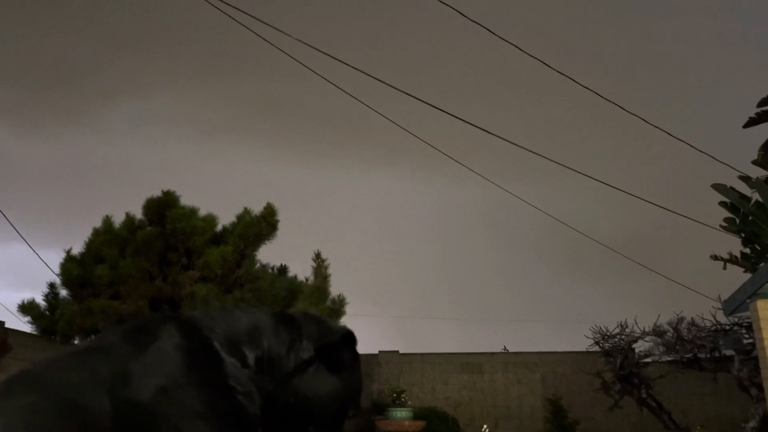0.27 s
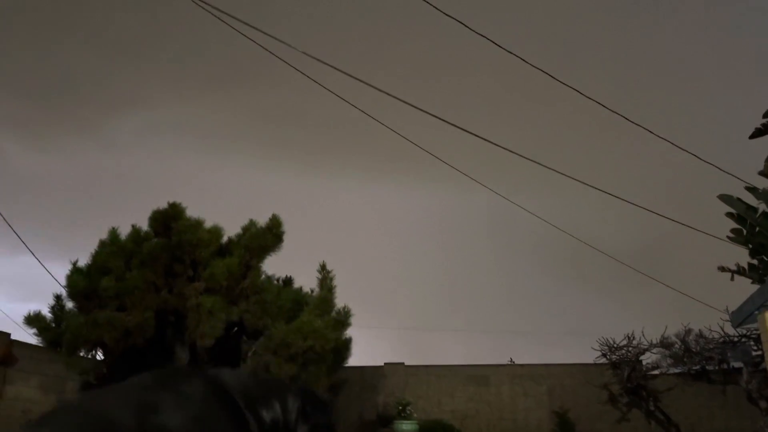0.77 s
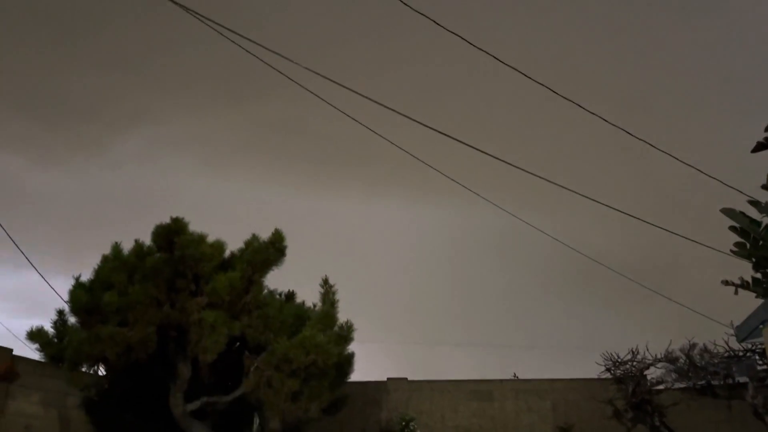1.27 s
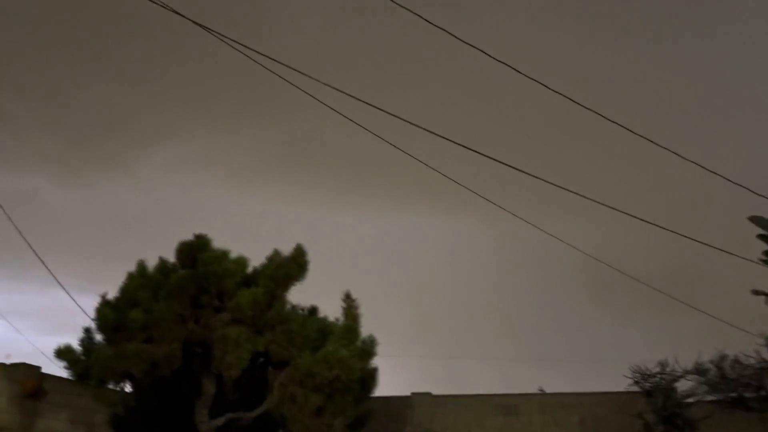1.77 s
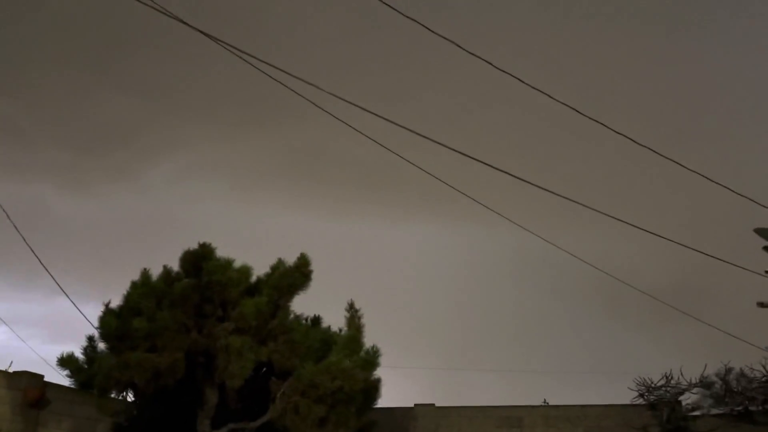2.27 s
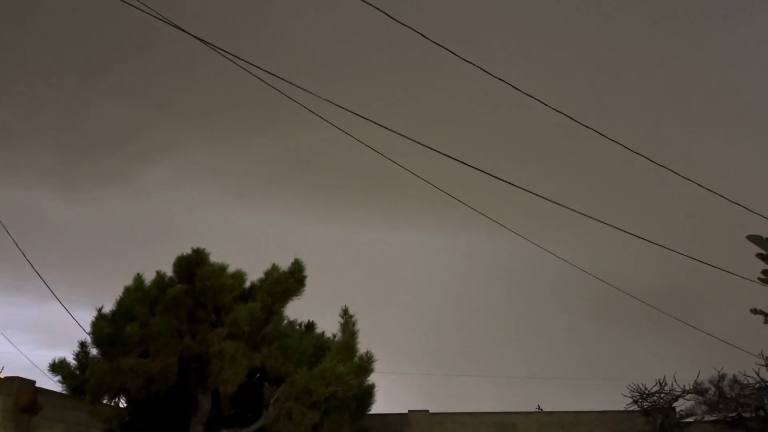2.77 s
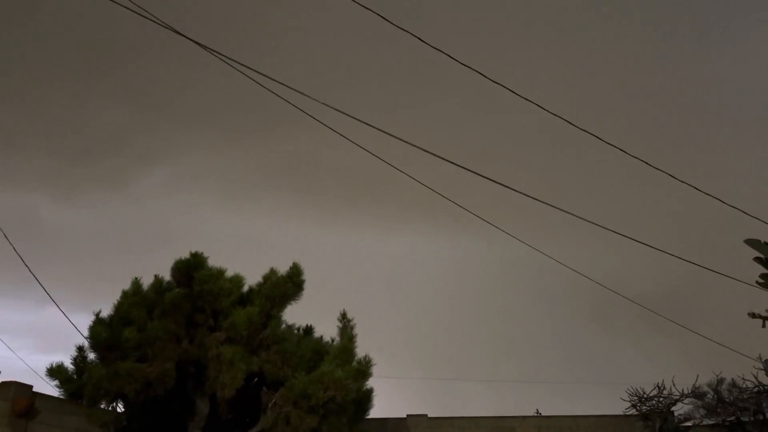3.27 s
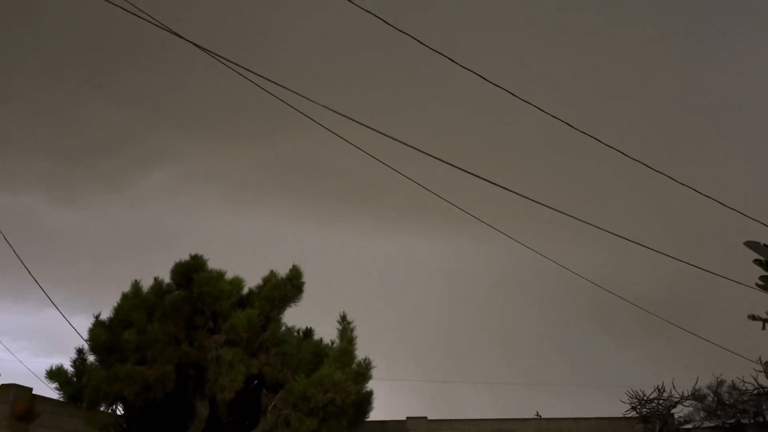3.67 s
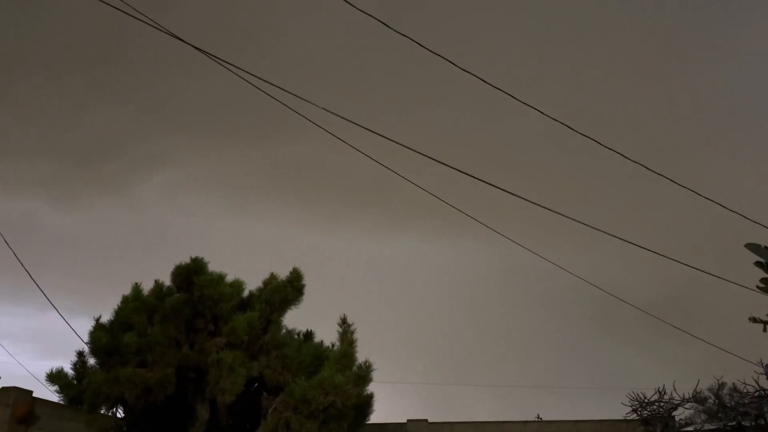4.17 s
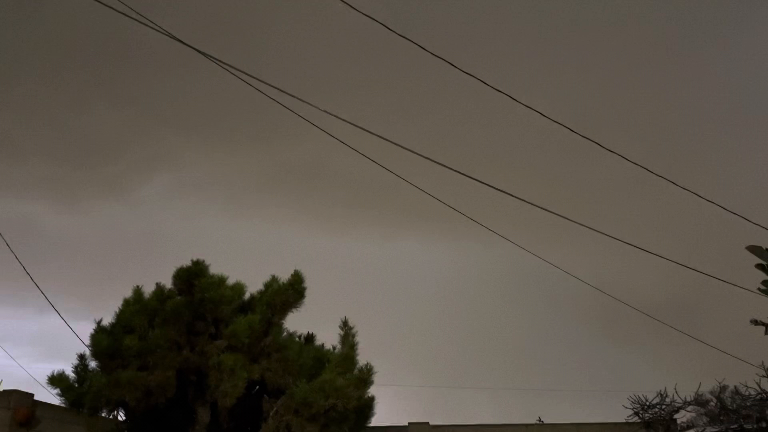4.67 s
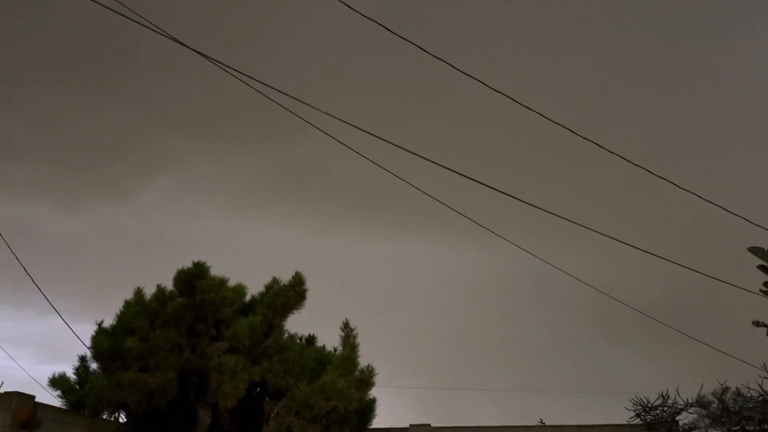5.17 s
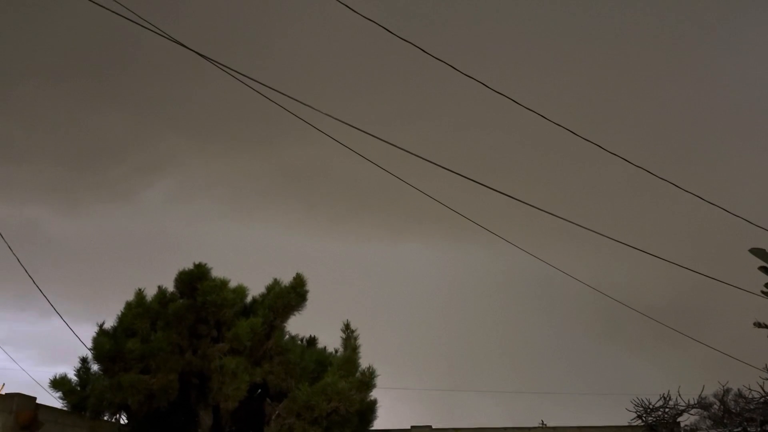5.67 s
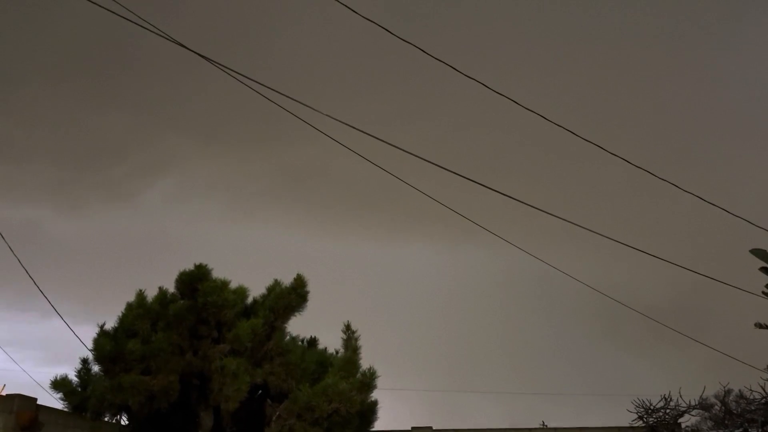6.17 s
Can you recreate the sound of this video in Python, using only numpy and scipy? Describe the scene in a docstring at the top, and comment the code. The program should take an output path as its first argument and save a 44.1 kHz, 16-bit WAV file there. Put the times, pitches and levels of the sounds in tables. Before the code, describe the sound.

Deep thunder rolls and booms in uneven waves over a walled yard while a dog close by moves off, collar tags clinking, claws tapping.

```python
"""A walled yard at night, heard in stereo. From the start far thunder rolls on as filtered noise and
random shocks from a long lightning channel; its nearest shocks are single booms.
Close by a dog moves off at once: gritty noise for its rustling coat, ringing modes for its collar tags.
The clinks thin out, then claws tap the paving three times as noise bursts with rings. Late on the booms
cease and the roll runs on over a bed of air and microphone hiss."""
import sys
import numpy as np
from scipy import signal
from scipy.fft import rfft, irfft, next_fast_len
from scipy.io import wavfile
from scipy.ndimage import uniform_filter1d

SR = 44100
rng = np.random.default_rng(int(sys.argv[2]) if len(sys.argv) > 2 else 0)


def unload_audio(sound):
    """Save the sound as a 16-bit wav file, at the path given as the first command line argument."""
    columns = np.transpose(np.atleast_2d(sound))
    # keep every value between -1 and 1, then stretch to whole-number steps
    steps = np.round(np.clip(columns, -1, 1) * 32767)
    wavfile.write(sys.argv[1], SR, steps.astype(np.int16))


N = 282681
SIZE = next_fast_len(N + SR // 4)  # padded, so that filter tails do not wrap onto the start
HZ = np.fft.rfftfreq(SIZE, 1 / SR)
# Levels in all tables hold at the source, before the stereo image and the recorder.


def amp(db):
    """Amplitude factor of a level in dB."""
    return 10 ** (np.asarray(db) / 20)


def evened(x):
    """Scales a signal to rms 1."""
    return x / np.sqrt(np.mean(x ** 2) + 1e-20)


def read(points, hz):
    """Reads a table of (f/Hz, value) on a log-frequency axis."""
    f, value = np.transpose(points)
    return np.interp(np.log(hz + 1), np.log(f + 1), value)


def curves(rows):
    """Draws each column of a (t/s, ...) table as a curve over the whole scene."""
    s, *columns = np.transpose(rows)
    return [np.interp(np.arange(N) / SR, s, column) for column in columns]


def filtered(x, gain):
    """Filters a signal by a gain over HZ."""
    return irfft(rfft(x, SIZE) * gain, SIZE)[..., :N]


def coloured(x, gain):
    """Filters two draws by a gain over HZ, to rms 1."""
    return evened(filtered(x, gain))


def shocks(per_s, spread_db):
    """Two trains of random impulses, a few of them large."""
    rarity = np.minimum(rng.exponential(1, (2, N)), 4)
    size = amp(spread_db * rarity) * rng.standard_normal((2, N))
    return size * (rng.random((2, N)) < per_s / SR)


# Night air and microphone hiss, and a faint narrow whistle-like band at 12 kHz (f/Hz, level/dB per Hz)
HISS_COLOUR = [(1000, -13), (1800, 4), (2500, -1.5), (4200, -8), (7000, -11.5), (10000, -22.5),
               (11600, -26), (12000, -6), (12400, -20), (13000, -31), (15800, -27.5)]
HISS_DB, HISS_PATCHY_DB = -70, 4
# Below FRINGE_HZ the hiss is the thunder's fringe and follows its top, by FRINGE_FOLLOW dB per dB
FRINGE_FOLLOW, FRINGE_HZ, FRINGE_MID_DB = .4, 2600, -38.5


def hiss():
    """Patchy hiss above, and a lower part that rises and fades with the thunder."""
    spectrogram = signal.stft(rng.standard_normal((2, N)), nperseg=512)[2]
    patches = rng.standard_normal(spectrogram.shape[1:])
    patches = uniform_filter1d(patches, size=6, axis=0)  # over frequency
    patches = evened(uniform_filter1d(patches, size=10, axis=1))  # over time
    patchy = signal.istft(spectrogram * amp(HISS_PATCHY_DB * patches), nperseg=512)[1][:, :N]
    bed = coloured(patchy, amp(read(HISS_COLOUR, HZ)))
    low = 1 / (1 + (HZ / FRINGE_HZ) ** 4)
    fringe, rest = filtered(bed, low), filtered(bed, 1 - low)
    thunder_top_db = curves(ROLL)[-1]
    return amp(HISS_DB) * (rest + fringe * amp(FRINGE_FOLLOW * (thunder_top_db - FRINGE_MID_DB)))


# Claws on the paving, close by (t/s, snap level before colouring/dB, knock peak/dB)
TAPS = [(3.297, -40, -53.5), (3.41, -56.5, -66.5), (4.569, -41.5, -27.5)]
# Colour of a snap on the paving (f/Hz, level/dB)
PAVING = [(900, -10), (1500, 0), (2200, 0), (3000, -5), (3700, 1), (5500, -1), (9000, -18), (16000, -24)]
# Body that a tap leaves ringing (f/Hz, level/dB, t60/s)
TAP_RINGS = [(1300, -14.5, .03), (1990, -19, 0.02), (3580, -14, 0.012), (4470, -14.5, 0.015),
             (5700, -28.5, 0.07)]


def taps():
    """A dry snap with a rough ringing tail, and a hollow knock below it."""
    snaps, knocks, t = np.zeros((2, N + SR)), np.zeros((2, N + SR)), np.arange(4000) / SR
    for s, snap_db, knock_db in TAPS:
        fade = amp(-60 * t / 0.012) + amp(-13 - 60 * t / .07)  # a short and a long decay
        burst = rng.standard_normal((2, len(t))) * fade
        rough = 1 + evened(uniform_filter1d(rng.standard_normal((2, len(t))), size=90))
        rings = sum(amp(db - 60 * t / t60) * np.sin(2 * np.pi * hz * t) for hz, db, t60 in TAP_RINGS)
        knock = amp(knock_db - 60 * t / 0.044) * np.sin(2 * np.pi * 800 * t)
        start = round(s * SR)
        snaps[:, start:][:, :len(t)] += amp(snap_db) * (burst + rough * rings)
        knocks[:, start:][:, :len(t)] += knock
    return filtered(snaps[:, :N], amp(read(PAVING, HZ))) + knocks[:, :N]


# The dog's moves, close by (t of full strength/s, hold/s, rustle level/dB, brightness/dB, f of colour/Hz)
MOVES = [(0.044, 0.018, -64, 8, 5670), (0.119, 0.0037, -65.5, 6, 5610), (0.209, .02, -71, 9, 5620),
         (0.378, 0.013, -56.5, -4, 4790), (0.603, 0.0038, -66, 0, 5810), (0.634, 0.0065, -57, 0, 5650),
         (0.703, 0.013, -71, 7, 5920), (0.856, .13, -65, -6.5, 4740), (1.06, 0.048, -69.5, 2, 5390),
         (1.215, 0.015, -58, 0.5, 5660), (1.277, 0.015, -70, 1, 4890), (1.351, 0.047, -75, 9.5, 3420),
         (1.481, 0.13, -61.5, -7, 5390), (1.666, 0.015, -64, -9, 5450), (1.728, 0.042, -72, 2, 5710),
         (1.897, 0.024, -69, -3, 4130), (1.967, 0.1, -66, -6, 4620), (2.115, 0.029, -69.5, -13.5, 3970),
         (2.254, 0.042, -68, -1.5, 5640), (2.411, 0.018, -64.5, -6.5, 4610),
         (2.475, 0.046, -67, -3.5, 4770), (2.735, 0.011, -78, -6, 4050), (2.798, 0.051, -69.5, 4.5, 5630),
         (2.894, 0.076, -80.5, -14.5, 2996), (3.034, 0.037, -79, 13, 3020), (3.302, 0.012, -64.5, 0, 4260),
         (3.419, 0.032, -84, -5.5, 3500), (3.597, 0.067, -82, -5, 3180), (3.736, 0.016, -83.5, -3, 3050),
         (3.872, 0.047, -85.5, -3.5, 4500), (4.07, 0.045, -71, -11, 3850), (4.373, 0.017, -79.5, -5, 3740),
         (4.567, 0.048, -72.5, 1.5, 4016), (4.669, .05, -70.5, 3, 4820), (4.901, 0.046, -70.5, -13, 2950),
         (5.006, 0.077, -77, -15, 2980), (5.154, 0.017, -66.5, -7, 2850), (5.214, 0.035, -77, 12, 3690),
         (5.343, 0.019, -63.5, 0.5, 4230), (5.457, 0.044, -74, -10, 3010), (5.828, 0.031, -71, -13, 3110),
         (6.151, 0.055, -71, 1.5, 4820), (6.298, 0.044, -68.5, -28, 3860)]
RISE_DB_PER_S, FALL_DB_PER_S = 807, 450
# Faint, uneven stirring between the moves
STIR_DB, STIR_BRIGHT_DB, STIR_HZ = -84, -9.5, 3070
STIR_WANDER_DB, STIR_FADE_DB_PER_S = 5, 2


def moves():
    """Each move rises fast, holds and dies away; the loudest one dominates brightness and colour."""
    s, hold, db, bright_db, hz = np.transpose(MOVES)[:, :, None]
    t = np.arange(0, N + 64, 64) / SR
    before, after = np.maximum(s - t, 0), np.maximum(t - s - hold, 0)
    level = amp(db - RISE_DB_PER_S * before - FALL_DB_PER_S * after)
    wander = evened(uniform_filter1d(rng.standard_normal(len(t)), size=60))
    stir = amp(STIR_DB - STIR_FADE_DB_PER_S * t + STIR_WANDER_DB * wander)
    dull = level.sum(0) + stir
    bright = (level * amp(bright_db)).sum(0) + stir * amp(STIR_BRIGHT_DB)
    colour_hz = ((level * hz).sum(0) + stir * STIR_HZ) / dull
    return [np.interp(np.arange(N) / SR, t, curve) for curve in (dull, bright, colour_hz)]


# Dull and bright half of the rustle (f/Hz, level/dB per Hz)
DULL = [(1200, -28), (2000, 7), (3300, -2.5), (4600, -2), (6000, -2), (7500, 7), (9500, -32.5),
        (16000, -26.5)]
BRIGHT = [(5000, -23.5), (8000, -6), (10000, 2), (12000, -9), (13000, -1), (15000, -7), (16000, 7)]
# Modes of the metal collar tags (f/Hz, level/dB, t60/s)
TAGS = [(3880, -11, .07), (4325, -11, .06), (4580, -8, .05), (5655, -2, .06), (5745, -3, .055),
        (6020, -10, .04), (6300, -10, .03), (7140, -14, .04), (10480, -16, .04), (10880, -14, .05),
        (11350, -13, .03), (11810, -17, .045)]
GRIT_PER_S, GRIT_SPREAD_DB, GRIT_SHARE = 900, 2.6, 1.1
JINGLE_SHARE, JINGLE_FADE_DB_PER_S = 0.81, 5


def rustle():
    """Fur and collar rub: gritty hiss with a drifting colour, and uneven ticks that set the tags ringing."""
    level, bright, hz = moves()
    grit = evened(shocks(GRIT_PER_S, GRIT_SPREAD_DB))
    rub = rng.standard_normal((2, N)) + GRIT_SHARE * grit
    # a resonance 600 Hz wide follows hz: shift down, smooth, shift back up
    turn, r = np.exp(2j * np.pi * np.cumsum(hz) / SR), np.exp(-np.pi * 600 / SR)
    smooth = signal.lfilter([1 - r], [1, -r], rub / turn)
    scrape = evened((turn * smooth).real)
    coat = level * coloured(rub + 0.69 * scrape, amp(read(DULL, HZ)))
    sheen = bright * coloured(rub, amp(read(BRIGHT, HZ)))
    modes = sum(amp(db) / (1 + 1j * (HZ - f) * t60 / 1.1) for f, db, t60 in TAGS) * (HZ > 3000)
    modes /= np.sqrt(np.mean(abs(modes) ** 2))
    jingle = JINGLE_SHARE * amp(-JINGLE_FADE_DB_PER_S * np.arange(N) / SR)
    tags = filtered(level * jingle * evened(rub + 1.4 * grit), modes)  # ring on after each rub
    return coat + tags + sheen


# Clinks of the collar tags, close by (t/s, peak level/dB, brightness/dB)
CLINKS = [(0.0537, -43, -4.5), (0.066, -34.5, 1), (0.1246, -40, 0), (0.197, -43, 3), (0.3816, -39, -10),
          (0.387, -53, -3), (0.533, -56, -12), (0.599, -44, 1), (0.626, -46, 20), (0.636, -27.5, 4.5),
          (0.705, -37, 5), (0.713, -48, 2), (0.897, -38, -1), (0.942, -43, -10), (0.983, -43.5, -6.5),
          (1.2, -47, 4), (1.2444, -66, 6), (1.494, -46, -11), (1.548, -51, -10), (1.580, -43, -19),
          (1.668, -46, 1), (1.6763, -37.5, 2), (1.919, -50, 10), (1.9823, -48.5, -14), (2.119, -50, -19),
          (2.251, -39, -10), (2.4063, -49.5, -1.5), (2.818, -45, 6), (4.649, -43, 5)]


def clinks():
    """A sharp tick, the tags ringing with other strengths each time, and a short scatter off the walls."""
    out, t = np.zeros((2, N + SR)), np.arange(5000) / SR
    hz, mode_db, t60 = np.transpose(TAGS)[:, :, None]
    high = signal.butter(2, 3200, "high", fs=SR, output="sos")
    top = signal.butter(2, [8500, 14500], "band", fs=SR, output="sos")
    for s, db, bright_db in CLINKS:
        strength, phase = rng.random((2, 2, len(TAGS), 1))
        modes = amp(mode_db + 6.5 * strength - 60 * t / t60) * np.sin(2 * np.pi * (hz * t + phase))
        ring = modes.sum(1) * (1 - np.exp(-t / 0.00046))  # soft onset
        tick, scatter = amp(-60 * t / 0.0093), amp(-27.5 - 60 * t / 0.05)
        burst = rng.standard_normal((2, len(t))) * (tick + scatter)
        sound = signal.sosfilt(high, burst) + amp(-12.5) * ring
        upper = signal.sosfilt(top, sound)
        sound = sound - upper + amp(bright_db) * upper
        out[:, round(s * SR):][:, :len(t)] += amp(db) * sound / abs(sound).max()
    return out[:, :N]


# Far echoes that never stop (f/Hz, level/dB per Hz)
FAR_COLOUR = [(12, -37.5), (20, -32.5), (77, -5), (184, -1), (368, -11.5), (460, -15), (612, -14.5),
              (920, -34.5), (1410, -50), (2600, -62), (3380, -98), (5720, -120)]
FAR_DB = -31.5
# The roll (t/s, then level/dB of the deep roll, the growl, the roar and the scattered top)
ROLL = [(0.0, -30, -29, -36, -39), (0.19, -28, -28.5, -39.5, -40.5), (0.21, -25, -28, -33, -38.5),
        (0.37, -28.5, -29, -38.5, -39.5), (0.5, -37.5, -34, -32, -40.5), (0.54, -21, -26.5, -31, -36.5),
        (0.585, -28, -21, -33.5, -37), (0.7, -25.5, -19, -29.5, -37), (0.86, -19, -23, -23.5, -36),
        (0.87, -19, -23.5, -23.5, -34.5), (0.91, -30.5, -20, -30, -38.5), (1.23, -23.5, -25, -29.5, -36.5),
        (1.3, -24.5, -29, -37, -36.5), (1.39, -24.5, -20.5, -25.5, -31.5), (1.53, -30, -29.5, -35, -38),
        (1.76, -34, -33.5, -39.5, -41.5), (1.95, -26, -29.5, -34.5, -39), (2.17, -21.5, -29, -33, -41.5),
        (2.25, -23, -16.5, -29.5, -36), (2.33, -27, -21.5, -30.5, -38.5),
        (2.58, -29.5, -24.5, -32.5, -38.5), (2.64, -13.5, -25.5, -30, -39), (2.71, -29, -20.5, -26.5, -37),
        (2.76, -11, -20.5, -26.5, -35.5), (2.99, -31.5, -26.5, -38, -43), (3.21, -27.5, -33, -36, -43.5),
        (3.44, -24.5, -18.5, -35.5, -42.5), (3.47, -14, -29, -29, -42), (3.6, -27.5, -26, -36, -44.5),
        (3.67, -24.5, -21.5, -31, -42.5), (3.81, -32, -34, -42.5, -47), (3.87, -12.5, -23.5, -35.5, -45),
        (4.03, -18, -28.5, -37, -44), (4.06, -26.5, -25, -35.5, -44), (4.13, -19, -25.5, -36, -47),
        (4.3, -25, -26.5, -34.5, -48), (4.48, -25.5, -31, -39, -45), (4.67, -28.5, -36, -39.5, -48.5),
        (4.76, -12, -25.5, -36, -45), (4.97, -26, -18.5, -31, -46), (5.01, -22, -16.5, -30, -43.5),
        (5.22, -24, -32, -36.5, -44), (5.29, -25, -15, -28.5, -45), (5.42, -13.5, -20, -27, -44.5),
        (5.47, -27.5, -24.5, -30, -43.5), (5.52, -22.5, -24.5, -34.5, -45),
        (5.68, -21.5, -27.5, -35.5, -48), (5.81, -31.5, -39.5, -37.5, -50),
        (5.95, -26.5, -25.5, -35, -48.5), (6.29, -30.5, -36, -40, -50), (6.4, -51, -20.5, -34, -48)]
PARTS_HZ = [65, 185, 460, 1100]  # centre of each part
# Colour of the thunder after miles of air and the ground bounce (f/Hz, level/dB per Hz)
THUNDER = [(12, -43.5), (25, -22.5), (45, -7.5), (60, -1), (100, 3), (135, -5.5), (180, -5), (266, -9.5),
           (361, -14.5), (480, -25.5), (560, -20.5), (920, -25.5), (1250, -38), (1400, -43), (2600, -84),
           (4000, -110)]
# Narrow dips and peaks where bounces off ground and walls meet the thunder (f/Hz, level/dB, width/Hz)
BOUNCES = [(33, 3.5, 4.7), (142, -0.5, 1.3), (224, -3, 20), (358, 3, 24), (706, -3.5, 18), (1035, -6, 38),
           (1402, -3.5, 84)]


def roll(boom):
    """Bends of the channel send shocks; long, middling and short ones swell apart over far echoes."""
    bounce_db = sum(db * np.exp(-((HZ - hz) / width) ** 2) for hz, db, width in BOUNCES)
    far_gain = amp(read(FAR_COLOUR, HZ) + bounce_db)
    out = amp(FAR_DB) * coloured(rng.standard_normal((2, N)), far_gain)
    thunder_gain = amp(read(THUNDER, HZ) + bounce_db)
    for k, level_db in enumerate(curves(ROLL)):
        share = read(list(zip(PARTS_HZ, np.eye(4)[k])), HZ)
        part = np.sin(np.pi / 2 * share) ** 2  # parts cross-fade on a log-frequency axis
        train = shocks(per_s=12 * PARTS_HZ[k], spread_db=1.65)  # short shocks are scattered into many more
        # shocks that bunch into a boom leave the roll around it
        bunched = uniform_filter1d(abs(filtered(boom, part)), size=1500) / .03
        thinned = 1 + bunched * [1.3, 1.1, 0.9, 0.3][k]
        out += amp(level_db) / thinned * coloured(train, part * thunder_gain)
    return out


# The loudest single booms, from the nearest shocks (t/s, level/dB, f/Hz, length/ms)
BOOMS = [(0.171, -17.5, 153, 9.5), (0.284, -18, 110.4, 13), (0.532, -13, 183, 10), (0.606, -14.5, 149, 5.5),
         (0.629, -14, 211.6, 28), (0.719, -15.5, 234, 10), (0.783, -22.5, 592, 14), (0.785, -9, 89.3, 14),
         (0.81, -18, 179, 11), (0.864, -11.5, 249, 4.1), (0.875, -6, 86.8, 12), (0.933, -19, 196.5, 16),
         (0.961, -15.5, 73.7, 12), (1.078, -13.5, 168, 20), (1.115, -17.5, 70.5, 25),
         (1.217, -18.5, 108.5, 27), (1.399, -22.5, 206, 13), (1.428, -17, 122, 11), (1.487, -14.5, 107, 13),
         (2.212, -13.5, 160, 16), (2.253, -11, 88.9, 18), (2.351, -15, 187.7, 26), (2.397, -17, 372, 7.7),
         (2.44, -17, 194.3, 6.9), (2.476, -15, 107.7, 12), (2.633, -11.5, 80.5, 17), (2.671, -19, 373, 11),
         (2.679, -16.5, 88.6, 8.7), (2.726, -13.5, 179.6, 18), (2.772, -12.5, 74.1, 19),
         (2.814, -16.5, 111.3, 50), (2.849, -20, 373, 17), (2.861, -23, 220, 20), (3.089, -14, 92.2, 5.9),
         (3.385, -17, 175, 12), (3.402, -7.5, 88.8, 3), (3.474, -10, 87.3, 19), (3.568, -17, 82.3, 16),
         (3.679, -15, 95.8, 27), (3.865, -14.5, 84, 8.9), (3.89, -14, 87.4, 8.4), (3.951, -14.5, 84.4, 10),
         (3.983, -15.5, 74.5, 34), (4.111, -17, 168.4, 12), (4.152, -16, 90.7, 9.8),
         (4.193, -15.5, 88.2, 13), (4.244, -10.5, 89.6, 9), (4.268, -14.5, 97.6, 15),
         (4.405, -16, 101.2, 14), (4.457, -17, 93, 13), (4.739, -10, 66.9, 14), (4.771, -7, 83.2, 9.4),
         (4.804, -11.5, 153, 21), (4.869, -12, 90, 9), (4.932, -12.5, 84.6, 4.3), (5.047, -22.5, 149.3, 79),
         (5.072, -15.5, 195, 17), (5.175, -13.5, 70.5, 5.6), (5.281, -7, 87.2, 3.8), (5.299, -25, 368, 22),
         (5.303, -7.5, 83.8, 7.5), (5.35, -7, 125.7, 9), (5.361, -20, 359, 11), (5.407, -8, 73.5, 17),
         (5.431, -17, 171, 14), (5.521, -18.5, 73, 24), (5.595, -19, 78.3, 9.9), (5.677, -15, 77.3, 15)]


def booms():
    """A sharp front, then a push and pull of air that sags in pitch; only in the draw both sides share."""
    out, t = np.zeros(N + SR), np.arange(-8000, 8000) / SR
    for s, db, hz, ms in BOOMS:
        u = t / (ms / 1000)
        skewed = u * np.where(u < 0, 1.2, .8)  # rises faster than it falls
        shape = np.exp(-2 * np.log(2) * skewed ** 2)
        turns = hz * t * (1 - 0.04 * np.tanh(u))
        push_pull = shape * np.sin(-2 * np.pi * turns)
        front_shape = np.exp(-((t + .003) / .007) ** 2)  # 3 ms ahead of the middle
        front = min(.55, 50 / hz) ** 2 / .55 * front_shape * np.sin(2 * np.pi * 2.1 * turns)
        out[round(s * SR):][:16000] += amp(db) * (push_pull + front)
    return np.array([out[8000:][:N], np.zeros(N)])


# Stereo image by frequency: likeness of left and right (f/Hz, 0-1), phase shift of right behind left
# (f/Hz, phase/rad), left minus right (f/Hz, level/dB)
LIKENESS = [(30, .94), (60, .965), (130, .96), (290, .82), (640, .42), (1400, .35), (2500, .4), (4500, .5),
            (6000, .45), (7000, .92), (15000, .88)]
PHASE_SHIFT = [(300, 0), (700, .7), (1400, 1.3), (3000, -.4), (6000, .3), (7000, 3.1), (8900, 3.2),
               (10400, 6.2), (12600, 6.5), (13600, 9.3), (15500, 9.6)]
TILT = [(30, 3), (60, 2), (200, 1), (400, .3), (1300, .3), (4400, -1.3), (8000, -.2), (15000, 0)]


def stereo_image(draws):
    """Likeness, phase shift and level difference of left and right by frequency, from two draws."""
    first, second = rfft(draws, SIZE)
    same, half_tilt = np.clip(read(LIKENESS, HZ), 0, 1), amp(read(TILT, HZ) / 2)
    shifted = np.exp(-1j * read(PHASE_SHIFT, HZ)) * first
    right = same * shifted + np.sqrt(1 - same ** 2) * second
    return irfft(np.array([first * half_tilt, right / half_tilt]), SIZE)[:, :N]


def scene():
    """Sums hiss, dog and thunder and spreads them over left and right."""
    boom = booms()
    dog = taps() + rustle() + clinks()
    thunder = roll(boom[0]) + boom
    return stereo_image(hiss() + dog + thunder)


EDGE_HZ = 15830


def record(dry):
    """The microphone loses the deepest bass; then the band limit of the recorder."""
    thin = signal.sosfilt(signal.butter(2, 38, "high", fs=SR, output="sos"), dry)
    band_limit = signal.firwin(511, EDGE_HZ, window=("kaiser", 9), fs=SR)
    return signal.oaconvolve(thin, band_limit[None], "same")


dry = scene()
out = record(dry)
unload_audio(out)
```